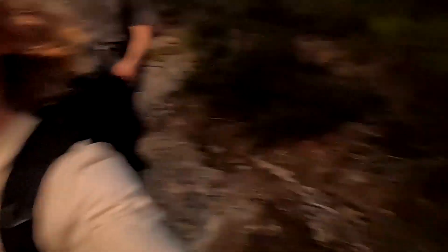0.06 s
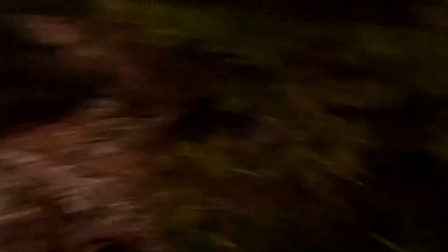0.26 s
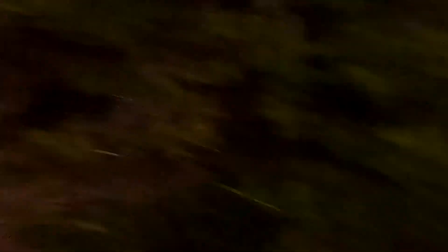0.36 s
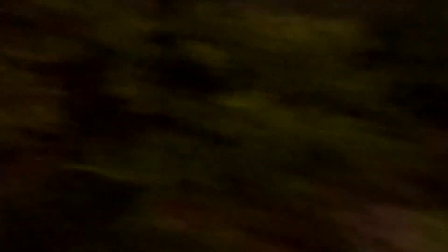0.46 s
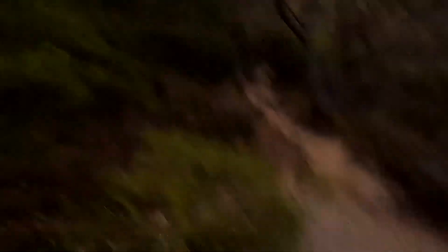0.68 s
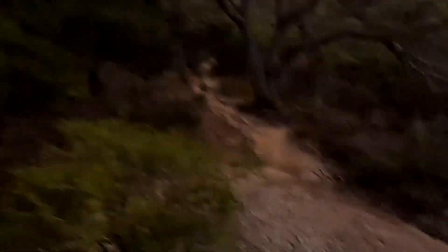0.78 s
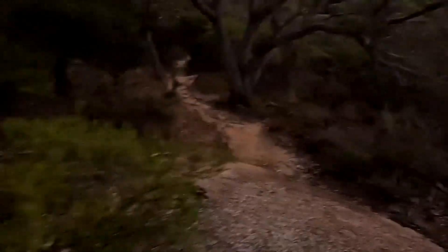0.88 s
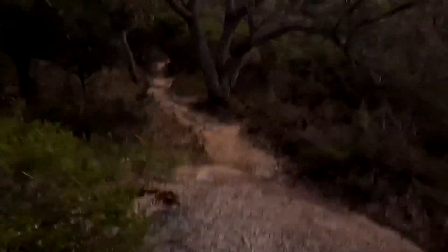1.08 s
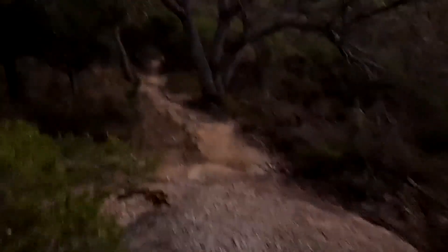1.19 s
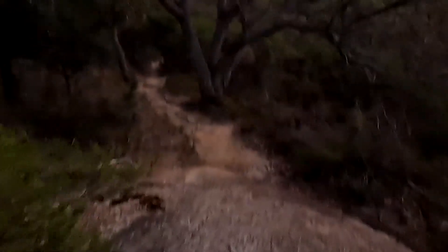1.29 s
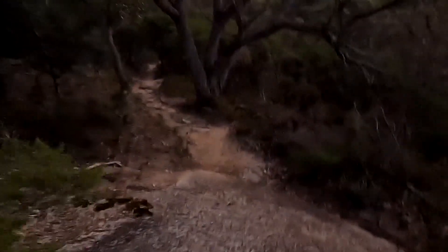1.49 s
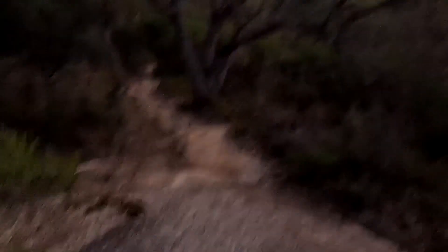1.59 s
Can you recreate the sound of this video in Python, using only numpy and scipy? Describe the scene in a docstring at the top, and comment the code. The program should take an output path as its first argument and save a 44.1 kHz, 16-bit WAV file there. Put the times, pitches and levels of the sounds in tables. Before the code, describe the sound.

Footsteps of several walkers on a rocky dirt track: dull boot knocks, gritty crunches and pebble clicks in irregular clusters, with scuffing between, low wind buffeting, and a quiet outdoor bush background, heard close on a handheld microphone.

```python
"""Boots knock on stone, crunch grit and click pebbles as several walkers step briskly along a dirt track.
Knocks are damped rings, heel blows sharp pressure dips, clicks a few decaying cycles, and crunches and
scuffs are showers of random grains; all but the scuffs leave a short scatter off ground and scrub.
Something swishes in narrow bands of noise. Wind, as two sizes of noisy eddies, buffets the microphone,
strongest near 0.8 s, over a quiet bush floor of shaped noise."""
import sys
import numpy as np
from scipy import signal
from scipy.fft import rfft, irfft
from scipy.io import wavfile
from scipy.ndimage import uniform_filter1d

SR = 44100
rng = np.random.default_rng(int(sys.argv[2]) if len(sys.argv) > 2 else 0)


def dump_mix(stems):
    """Bounce the given channels to the path in sys.argv[1] as a 16-bit WAV at rate SR."""
    frames = np.atleast_2d(stems).T  # one column per channel
    limited = np.clip(frames, -1, 1)  # hard clip at full scale
    pcm = np.round(limited * 32767).astype(np.int16)
    wavfile.write(sys.argv[1], SR, pcm)


def gain_from_decibels(decibels):
    """Convert decibel values to linear amplitude factors."""
    exponent = np.asarray(decibels, float) / 20
    return 10 ** exponent


N = 72765
T = np.arange(N) / SR


def noise():
    """White noise."""
    return rng.standard_normal(N)


def unit(x):
    """Scale to rms 1."""
    return x / np.sqrt(np.mean(x ** 2))


def colour(x, points):
    """Shape a spectrum by (Hz, dB) points, silent below half the first frequency, at rms 1."""
    hz, db = np.array(points, float).T
    f = np.fft.rfftfreq(N, 1 / SR)
    gain = gain_from_decibels(np.interp(np.log(f + 1), np.log(hz), db)) * (f > hz[0] / 2)
    return unit(irfft(rfft(x) * gain, N))


def band(x, hz, width):
    """Resonant band-pass at rms 1, width as a share of the centre."""
    b, a = signal.iirpeak(min(hz, 0.45 * SR), 1 / max(width, 0.01), fs=SR)
    return unit(signal.lfilter(b, a, x))


def walk(rate):
    """Random levels held 1 / rate s and smoothed twice over that time."""
    hold = int(SR / rate)
    levels = np.repeat(rng.standard_normal(N // hold + 1), hold)[:N]
    return uniform_filter1d(uniform_filter1d(levels, hold), hold)


def grains(per_s, scatter_db):
    """Random clicks of either sign at rms 1, each raised by a random boost averaging scatter_db."""
    struck = rng.random(N) < per_s / SR
    boost = gain_from_decibels(scatter_db * rng.exponential(size=N))
    return unit(struck * rng.standard_normal(N) * boost)


def knocks():
    """Boots on stone: a soft push sets off a damped, dull ring with one overtone that dies quicker."""
    # Each row: start in seconds, level in dB, pitch in Hz, time to fall 60 dB in seconds.
    boot_hits = [(0.154, -36, 191, 0.056), (.1525, -24.5, 557, 0.13), (.187, -20.5, 317, 0.032),
                 (0.271, -24, 327, 0.025), (0.341, -24.5, 226, 0.052), (.394, -22.5, 825, 0.024),
                 (0.3985, -18.5, 226, 0.055), (0.402, -16, 113, 0.021), (0.813, -22.5, 115, 0.065),
                 (0.823, -23.5, 252.5, 0.066), (0.859, -35, 620, 0.019), (0.894, -21, 486, 0.039),
                 (0.901, -22, 142, 0.014), (1.082, -55, 259, 0.031), (1.144, -28, 517, 0.019),
                 (1.1482, -17.5, 1720, 0.017), (1.148, -15, 290, 0.022), (1.375, -19, 288, 0.012),
                 (1.4376, -17.5, 753, 0.018), (1.4457, -15, 290, 0.016), (1.493, -32.5, 574, 0.0086),
                 (1.573, -23.5, 490, 0.01), (1.588, -38, 1220, 0.011), (1.622, -22, 810, 0.0083)]
    rise_turns, overtone_ratio, overtone_db = 0.86, 1.8, -26  # rise in cycles of the pitch
    rough, rough_hz = 0.3, 400  # rms share of the level, random levels per second
    out = np.zeros(N)
    for s, db, hz, t60 in boot_hits:
        i = int(s * SR)
        t = np.maximum(T[i:i + SR // 5] - s, 0)
        rise = np.minimum(t * hz / rise_turns, 1) ** 2
        fall = np.exp(-np.log(1000) * t / t60)
        overtone = gain_from_decibels(overtone_db) * fall * np.sin(2 * np.pi * overtone_ratio * hz * t)
        ring = np.sin(2 * np.pi * hz * t) + overtone
        out[i:i + len(t)] += gain_from_decibels(db) * rise * fall * ring
    return out * (1 + rough * unit(walk(rough_hz)))  # loose ground makes the ring ragged


def heels():
    """Heel blows: one sharp pressure dip each, with a small overshoot on either side."""
    # Each row: time of the dip in seconds, peak in dB, distance from centre to zero crossing in seconds.
    blows = [(0.157, -21, 0.00094), (0.3966, -14.5, .0006), (0.8977, -19.5, 0.00047),
             (1.1505, -24.5, 0.00037), (1.441, -20.5, 0.00058)]
    out = np.zeros(N)
    for s, db, width in blows:
        x = (T - s) / width
        out -= gain_from_decibels(db) * (1 - x ** 2) * np.exp(-x ** 2 / 2)
    return out


def crunches():
    """Grit crushed under a sole: each band of random grains swells fast and dies away."""
    # Each row: start in seconds, level in dB before the swell and decay, centre in Hz,
    # decay time constant in seconds.
    bursts = [(0.155, -34, 950, 0.014), (.267, -50, 1510, 0.0093), (0.316, -48.5, 2500, 0.0051),
              (0.334, -49.5, 2660, 0.0044), (0.358, -40, 770, 0.04), (0.388, -49.5, 5100, 0.02),
              (0.393, -44.5, 1170, 0.0053), (0.667, -47, 1630, 0.008), (0.683, -43.5, 2500, 0.016),
              (0.753, -45, 2280, 0.011), (0.78, -39, 1790, 0.0067), (0.8, -49.5, 2900, 0.023),
              (1.157, -49.5, 2450, 0.036), (0.892, -37.5, 1620, 0.014), (0.905, -53, 1520, 0.042),
              (1.145, -43, 1840, 0.03), (1.29, -33.5, 1590, 0.01), (1.2918, -37.5, 3740, 0.0035),
              (1.295, -47.5, 6100, 0.0017), (1.306, -46.5, 2140, 0.008), (1.331, -53.5, 3100, 0.02),
              (1.309, -46, 6600, 0.0074), (1.441, -43.5, 1600, 0.015), (1.628, -36, 1400, 0.0026),
              (1.641, -41.5, 1260, 0.001)]
    rise, width = 0.41, 0.63  # shares of the decay and of the centre frequency
    out = np.zeros(N)
    grit = grains(9000, scatter_db=0.71)
    for s, db, hz, decay in bursts:
        t = np.maximum(T - s, 0) / decay
        envelope = (1 - np.exp(-t / rise)) * np.exp(-t)
        out += gain_from_decibels(db) * envelope * band(band(grit, hz, width), hz, width)
    return out


def ticks():
    """Two stones click: a few cycles at a slightly loose pitch, with a weaker rebound."""
    # Each row: start in seconds, level in dB, centre of the random pitch in Hz.
    clicks = [(0.155, -39.5, 3250), (.1565, -47.5, 5850), (0.188, -37.5, 1360), (0.2697, -46, 2620),
              (0.3332, -38.5, 1600), (.3325, -49, 5960), (0.6944, -33.5, 1940), (0.759, -51, 5650),
              (0.787, -39.5, 4940), (1.154, -39.5, 1840), (1.4398, -31.5, 1204), (1.4735, -52, 5500)]
    swell_turns = 0.98  # cycles until the envelope peaks
    rebound_s, rebound_db = 0.0035, -10  # typical delay, level below the click
    out = np.zeros(N)
    chance = rng.standard_normal((len(clicks), 2))
    for (s, db, hz), (detune, late) in zip(clicks, chance):
        rebound_delay = rebound_s * (1 + 0.14 * late)
        for delay, drop_db in ((0, 0), (rebound_delay, rebound_db)):
            turns = np.maximum(T - s - delay, 0) * hz * (1 + 0.06 * detune)
            envelope = np.e * turns / swell_turns * np.exp(-turns / swell_turns)
            out += gain_from_decibels(db + drop_db) * envelope * np.sin(2 * np.pi * turns)
    return out


def ground_echo(steps):
    """Scatter off ground and scrub: a short burst of decaying noise smears each step."""
    t60, echo_db = 0.27, -23  # seconds to fall 60 dB, level of the whole tail
    length = SR // 8
    tail = noise()[:length] * np.exp(-np.log(1000) * T[:length] / t60)
    tail = tail / np.sqrt(np.sum(tail ** 2))
    return gain_from_decibels(echo_db) * signal.fftconvolve(steps, tail)[:N]


def scuffs():
    """Soles dragging through dirt: dense fine grains that swell with the drag."""
    # Each row: time in seconds, level in dB before the flicker.
    drag = [(0, -57), (.05, -57.5), (0.129, -57.5), (.2, -48), (.3, -49), (0.389, -52.5), (0.45, -53.5),
            (0.558, -67.5), (0.687, -43.5), (.73, -52), (.82, -51.5), (0.861, -55), (0.921, -50),
            (1.02, -64), (1.12, -54), (1.178, -48.5), (1.251, -57), (1.311, -64), (1.4, -76), (1.46, -56.5),
            (1.532, -68.5), (1.65, -49)]
    # Tone of the dirt. Each row: frequency in Hz, relative density in dB per Hz.
    dirt_tone = [(150, -18), (400, 4), (900, 2), (1700, -5.5), (3000, -12), (5000, -21), (8000, -27),
                 (10500, -32.5), (14000, -31)]
    s, db = np.array(drag).T
    dirt = colour(grains(8000, scatter_db=1.6), dirt_tone)
    flicker_db = 3.0 * walk(40.1)
    return dirt * gain_from_decibels(np.interp(T, s, db) + flicker_db)


def swishes():
    """Narrow hisses: resonant bands of one noise that swell and fade."""
    # Each row: start in seconds, length in seconds, level in dB, centre in Hz.
    hisses = [(.23, .06, -67, 5300), (.353, 0.041, -58.5, 5350), (.397, 0.014, -56, 3950),
              (.62, .028, -65, 3950), (.232, .056, -73, 9900), (.345, .052, -71, 10000),
              (.648, .055, -66, 3200), (.6, .115, -68.5, 12500), (.33, .095, -69, 12800),
              (1.53, .13, -68, 12800), (0.209, 0.018, -52, 1580)]
    width = 0.09  # share of the centre frequency
    air = noise()
    out = np.zeros(N)
    for s, length, db, hz in hisses:
        swell = np.exp(-(2 * (T - s) / length - 1) ** 4)
        out += gain_from_decibels(db) * swell * band(band(air, hz, width), hz, width)
    return out


def wind():
    """Slow and small eddies push the diaphragm; their strength follows the gust, not chance."""
    # Each row: time in seconds, level of the slow eddies in dB, level of the small ones relative to it in dB.
    gusts = [(0.0, -31, -13), (0.018, -34.5, -14.5), (0.17, -31, 3), (0.196, -48, 7), (0.298, -37.5, 3.5),
             (0.373, -36, -1.5), (0.41, -28.5, 0.5), (0.446, -27, -21), (0.482, -44, 7), (0.512, -23, -15),
             (0.551, -40.5, 2), (0.583, -40, 12), (0.634, -26.5, -3.5), (0.68, -34.5, -3),
             (0.726, -23, -5.5), (0.756, -26.5, -1.5), (0.81, -19, -1.5), (0.953, -39.5, -1.5),
             (1.038, -33.5, -17), (1.172, -35, -2.5), (1.319, -39, -20), (1.36, -59.5, 15.5),
             (1.585, -37.5, -17.5), (1.65, -53.5, 10.5)]
    # Spectra of the two eddy sizes. Each row: frequency in Hz, relative density in dB per Hz.
    slow_eddies = [(12, -8.5), (28, 8.5), (50, -2), (80, -11), (200, -65), (500, -100)]
    small_eddies = [(40, 0), (70, 2.5), (110, 1.5), (160, -1.5), (280, -16), (600, -33.5), (1500, -74)]
    even_s = 0.06  # chance swells are levelled over this time
    s, db, rel_db = np.array(gusts).T
    out = np.zeros(N)
    for points, level_db in ((slow_eddies, db), (small_eddies, db + rel_db)):
        eddies = colour(noise(), points)
        eddies = eddies / np.sqrt(uniform_filter1d(eddies ** 2, int(even_s * SR)))
        out += eddies * gain_from_decibels(np.interp(T, s, level_db))
    return out


def bush_floor():
    """Quiet bush: steady noise, weighted towards the low end."""
    # Each row: frequency in Hz, relative density in dB per Hz.
    bush_tone = [(150, 2), (400, -2), (800, -12), (1500, -12.5), (3000, -28), (6000, -33.5), (8500, -34.5),
                 (11000, -81), (14500, -76)]
    return gain_from_decibels(-52.5) * colour(noise(), bush_tone)


def scene():
    """Steps with their scatter, then scuffs, swishes, wind and floor, in one channel."""
    steps = knocks() + heels() + crunches() + ticks()
    steps = steps + ground_echo(steps)
    mix = steps + scuffs() + swishes() + wind() + bush_floor()
    return mix[None]


def band_limit(x):
    """A steep low-pass at the top of the band."""
    return signal.sosfilt(signal.butter(12, 14800, fs=SR, output="sos"), x)


def record(dry):
    """The microphone dulls the top with a gentle low-pass."""
    mic_top_hz = 8300
    low_pass = signal.butter(2, mic_top_hz, fs=SR, output="sos")
    heard = signal.sosfilt(low_pass, dry)
    return band_limit(heard)


dry = scene()
out = record(dry)
dump_mix(out)
```